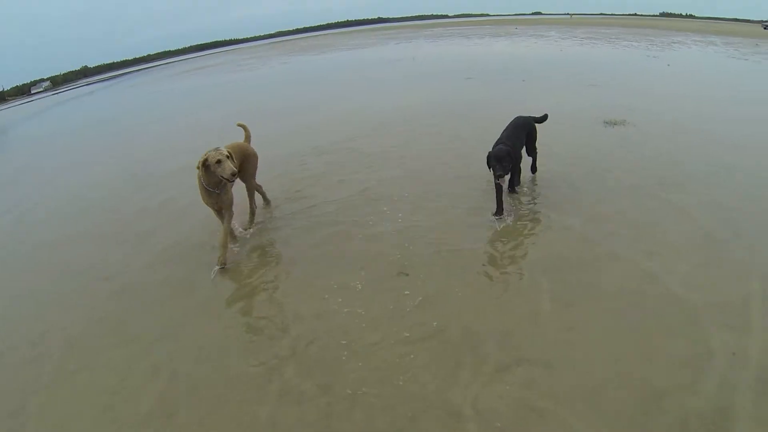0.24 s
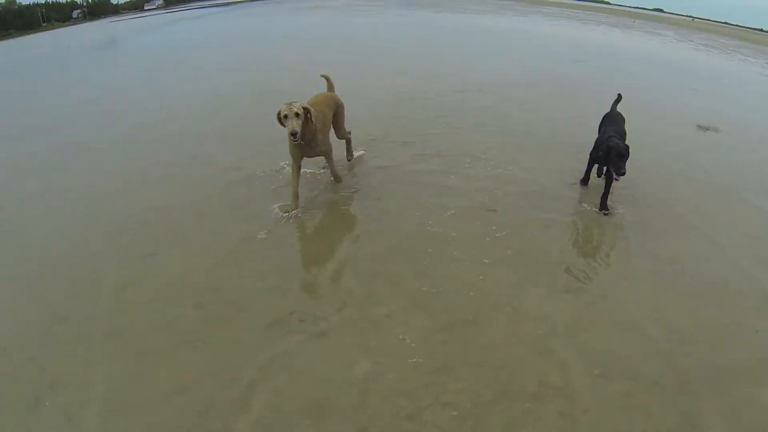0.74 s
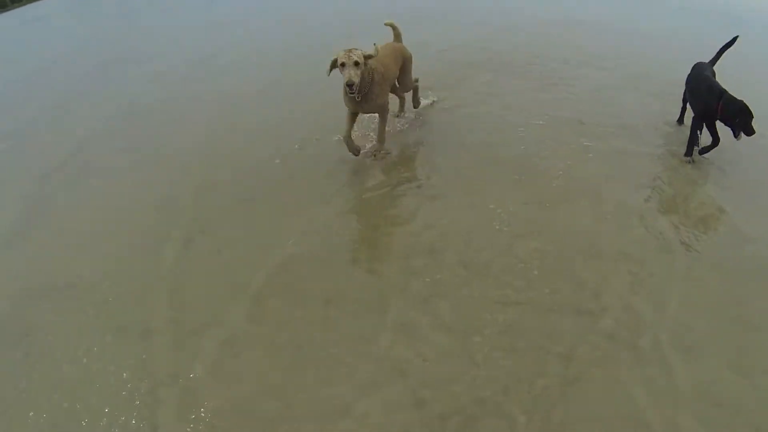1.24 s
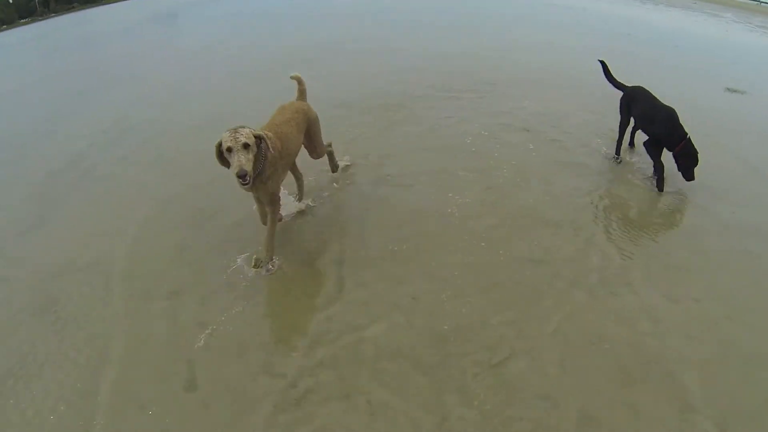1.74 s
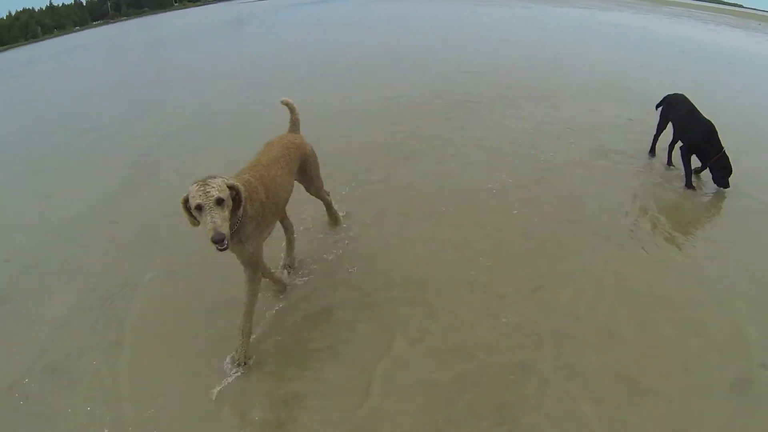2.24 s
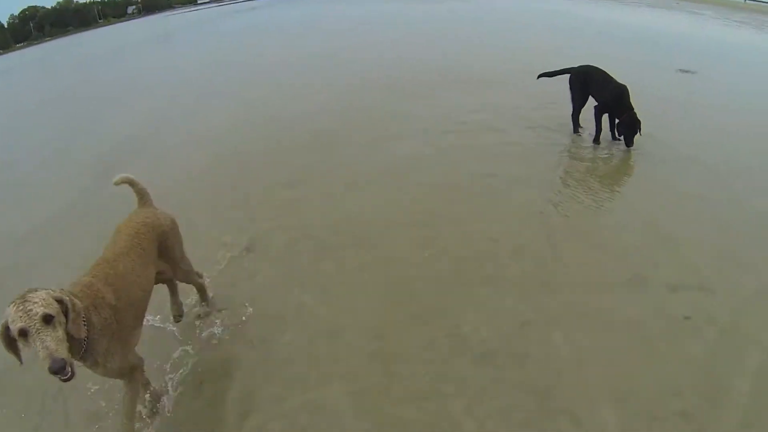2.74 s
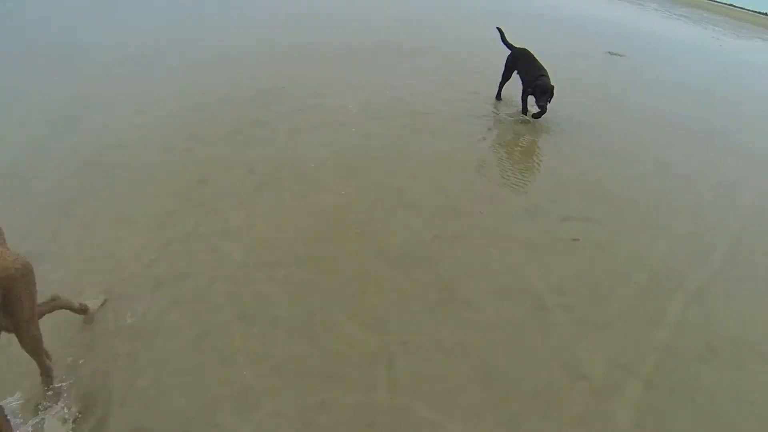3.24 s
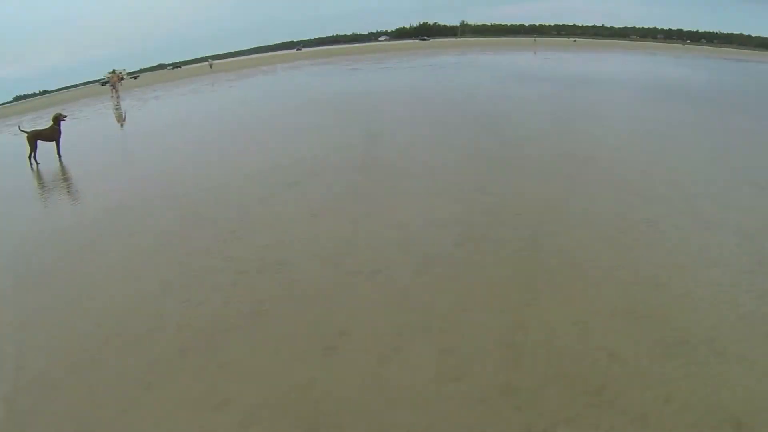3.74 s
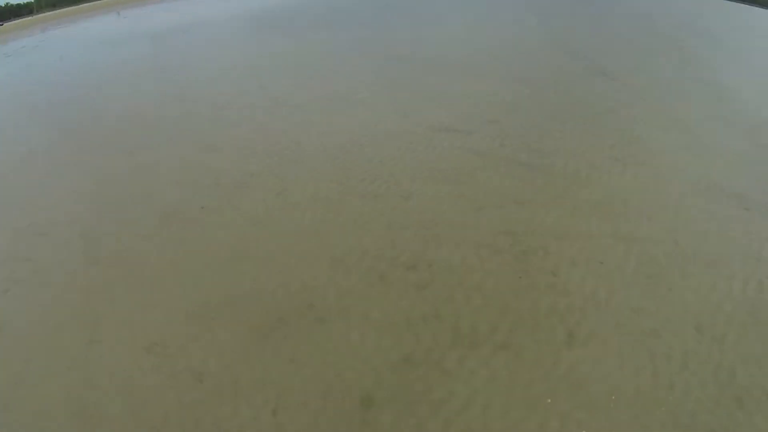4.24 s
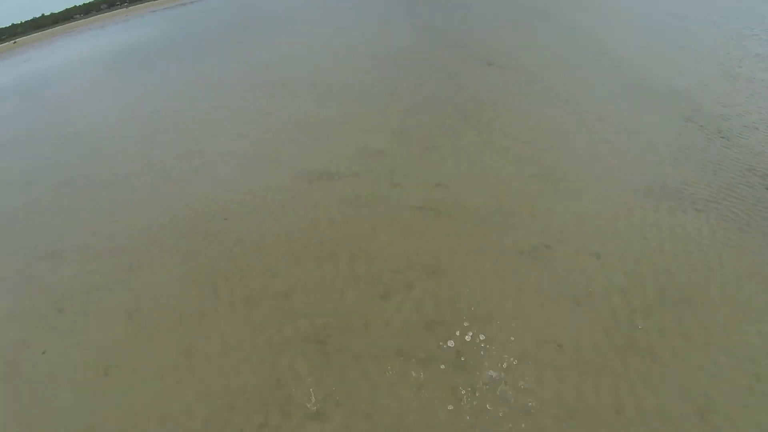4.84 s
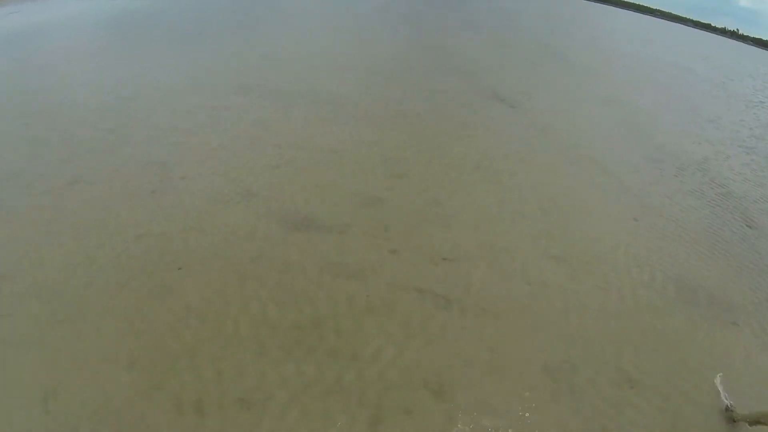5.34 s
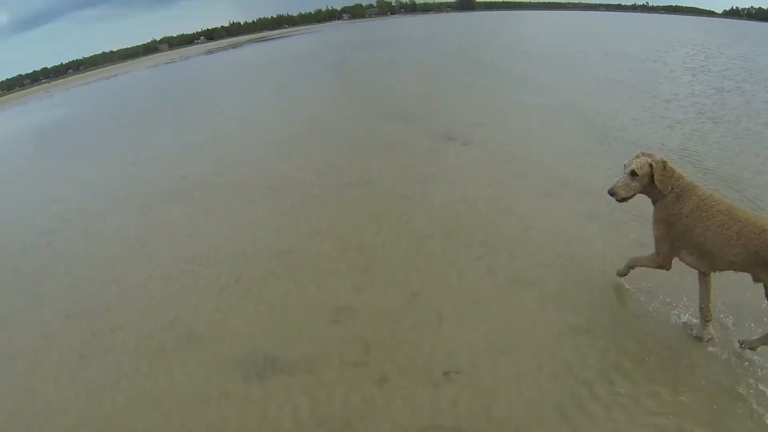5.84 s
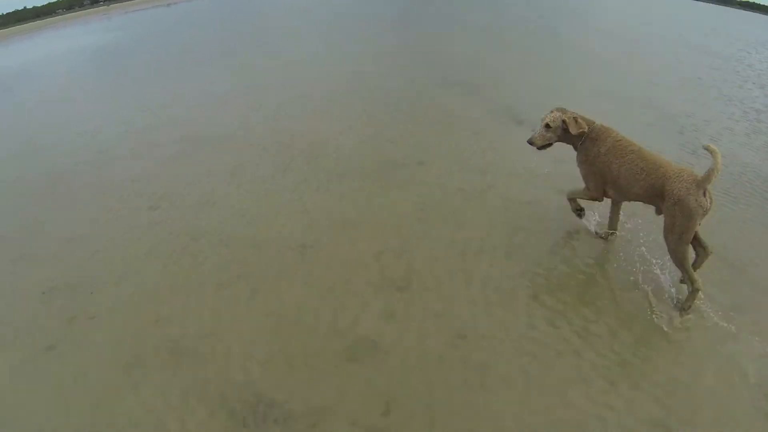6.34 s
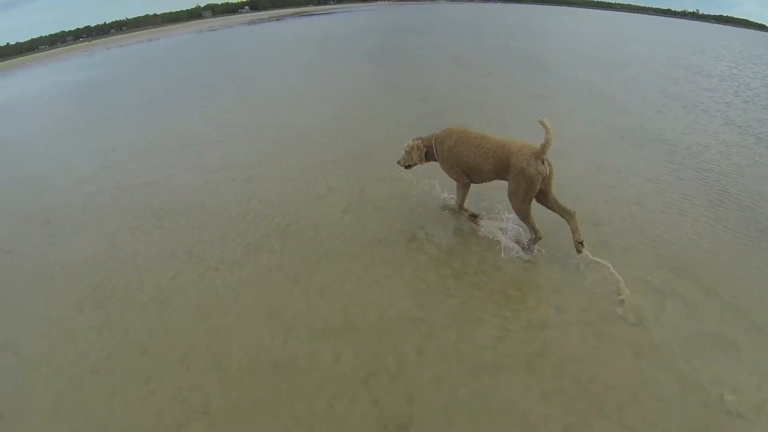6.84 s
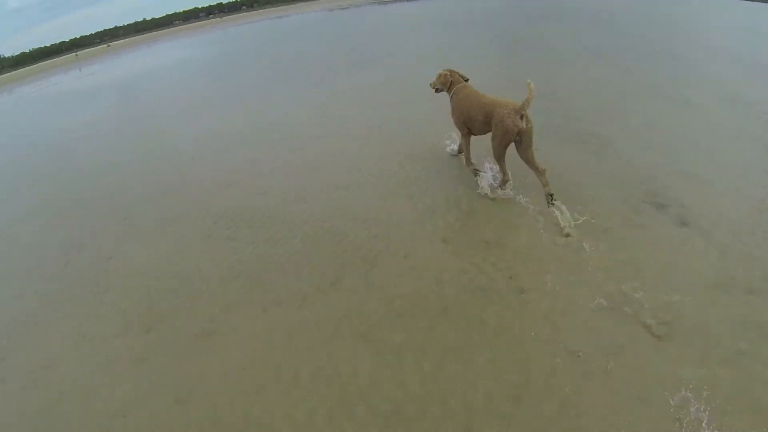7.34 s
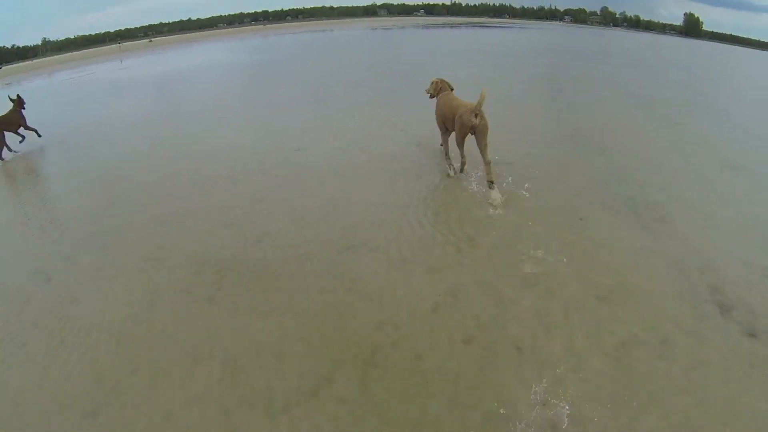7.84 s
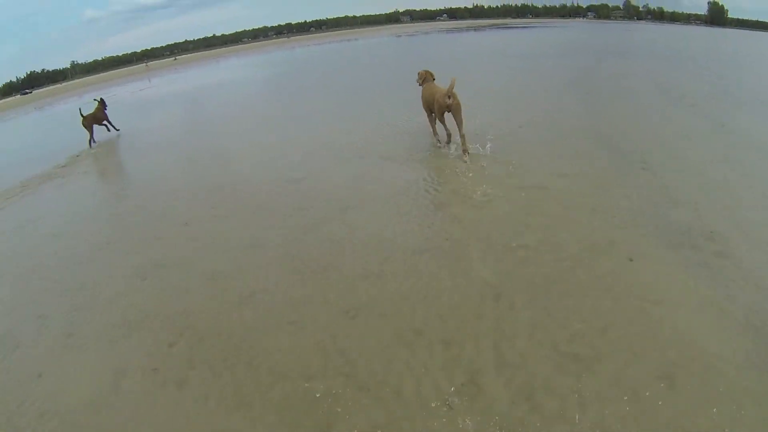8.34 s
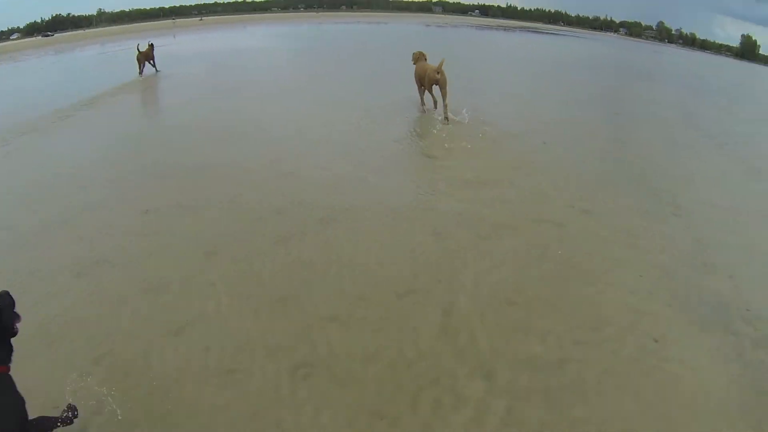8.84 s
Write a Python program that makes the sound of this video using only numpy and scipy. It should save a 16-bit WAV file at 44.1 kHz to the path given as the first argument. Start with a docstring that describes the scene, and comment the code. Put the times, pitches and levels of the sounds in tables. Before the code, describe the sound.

Dogs and a walker wade through shallow lake water, heard through a small plastic housing that makes the sloshes boxy and muffled. Gentle plops and trickles come first, over low step rumble and faint wind. Splashes grow quicker and brighter from about four seconds. Near seven and a half seconds a very loud thump hits, followed by creaking plastic and hand rubbing, then wet splashing and drips carry on.

```python
"""Wading dogs heard from a housing

Dogs and a walker wade through ankle-deep lake water; a microphone shut in a small plastic housing listens.
Slosh, spray and drops are rising-pitch bubbles and noise; the water wash comes dulled through resonances.
Steps and wind shake the mount with low noise; knocks push it and let it spring back.
Late on a hand rubs and creaks the housing: shaped noise, ringing modes and swells of the wading bubbles.
Loud peaks duck the gain."""
import sys
import numpy as np
from scipy import signal
from scipy.io import wavfile

SR = 44100
rng = np.random.default_rng(int(sys.argv[2]) if len(sys.argv) > 2 else 0)


def wav_record(signal):
    """Record a signal, one row per channel, as 16-bit PCM in the file named by sys.argv[1]."""
    frames = np.transpose(np.atleast_2d(signal))
    bounded = np.clip(frames, -1, 1)
    # unit amplitude maps onto the largest positive 16-bit level
    quanta = np.round(bounded * 32767).astype(np.int16)
    wavfile.write(sys.argv[1], SR, quanta)


def decibels_to_gain(level_db):
    """Convert a level in decibels to a linear amplitude gain (20 dB per decade)."""
    exponent = np.asarray(level_db, float) / 20
    return 10 ** exponent


N = 400869

# steady whine: f/Hz, width/Hz, level/dB
WHINE_BANDS = [(5105, 170, -77.5), (10480, 570, -84.5)]
# footfalls and jolts rocking the mount: crest t/s, sway level/dB, fade/s
STEP_SWELLS = [(0.0, -32, 0.23), (0.54, -29.5, 0.14), (0.79, -32, 0.023), (1.21, -31.5, 0.15),
               (1.75, -29, 0.18), (2.3, -25, 0.16), (2.799, -25.5, 0.087), (2.9, -23.5, 0.18),
               (3.17, -25, 0.023), (3.549, -16.5, 0.053), (4.051, -26.5, 0.091), (4.219, -23.5, 0.08),
               (4.658, -19.5, 0.063), (4.8, -23.5, 0.11), (5.235, -16.5, 0.09), (5.6, -30, 0.027),
               (5.891, -14, 0.061), (6.46, -16.5, 0.071), (7.078, -23, 0.13), (7.27, -52, 0.1),
               (7.74, -17.5, 0.16), (8.0, -19, 0.16), (8.21, -18, 0.13), (8.42, -23, 0.057),
               (8.62, -25, 0.088), (8.85, -17, 0.12), (9.05, -33, 0.11)]
# wind buffeting: t/s, level/dB
WIND_LEVELS = [(0.0, -50.5), (1.1, -47), (2.05, -50), (2.6, -43.5), (3.05, -45.5), (3.25, -48),
               (3.5, -44.5), (3.7, -51.5), (4.6, -48), (5.13, -45.5), (5.22, -38.5), (5.3, -47), (5.8, -51),
               (6.33, -48), (6.46, -42), (6.6, -48), (7.0, -52), (7.545, -49), (7.585, -25.5), (7.7, -43),
               (8.06, -39), (8.11, -46), (8.17, -36), (8.21, -33), (8.25, -42.5), (8.42, -53.5),
               (8.8, -45.5), (9.09, -49)]
# knocks on the mount: t/s, swing peak/dB, push time/ms, rebound period/ms, rebound Q, rattle re swing/dB
MOUNT_KNOCKS = [(0.2966, -35, 6.9, 12, 1.2, -28), (0.3087, -31, 3.9, 13, 0.69, -24),
                (0.775, -36.5, 8.5, 27, 1.3, -18), (1.465, -37, 6, 5.7, 1.3, -32),
                (2.2144, -14, 9, 28, 3.4, -28.5), (2.637, -32, 5.6, 12, 2.4, -22),
                (3.489, -28, 10, 77, 0.91, -34), (4.155, -38.5, 3.1, 4.14, 6.1, -25),
                (4.1685, -43, 6.3, 11, 1.1, -36), (4.234, -36.5, 3.8, 14, 0.78, -17),
                (4.488, -42, 0.79, 1.8, 0.68, -10), (4.681, -34.5, 7.8, 16, 0.96, -30),
                (5.19, -48, 12, 23, 0.59, -7), (5.243, -35.5, 3.5, 10, 0.53, -14),
                (5.873, -28.5, 9.2, 16, 0.46, -34), (7.544, 2, 8.9, 43, 1.2, -27),
                (7.602, -26, 2.5, 9, 1.2, -18), (7.716, -11.5, 27, 72, 0.81, -43),
                (7.717, -22.5, 6.3, 4.9, 5.5, -16), (7.998, -28.5, 4.6, 8.4, 1.6, -14),
                (8.009, -33, 2.5, 9.2, 2, -28), (8.026, -29, 4, 8.5, 1.3, -12),
                (8.074, -8, 23.4, 170, 0.41, -41), (8.1344, -11, 7.4, 46, 1.6, -31),
                (8.413, -18, 27, 39, 0.35, -47), (8.9208, -28.5, 4.9, 4.46, 5.1, -33),
                (8.943, -37, 3.9, 4.3, 1.2, -28)]
# stick-slip creaks of the housing: t/s, level/dB, upper modes re level/dB
SHELL_CREAKS = [(7.714, -8.5, -24), (7.727, -24, -28), (7.7309, -22, -24), (7.737, -34, -30),
                (8.008, -26, -30), (8.0133, -27, -35), (8.025, -28, -40), (8.026, -29, -35),
                (8.075, -16, -20), (8.185, -20, -40), (8.19, -10, -23), (8.199, -12.5, -15.5),
                (8.222, -13, -24), (8.3976, -18, -27), (8.4047, -11.5, -32), (8.4137, -17, -22),
                (8.436, -15.5, -37), (8.453, -15, -43), (8.4669, -12, -29), (8.92, -31, -28),
                (8.925, -28, -30), (8.939, -25, -28)]
# modes a creak rings: f/Hz, level/dB, t60/s, share of the creak's upper-mode level (0 to 1)
SHELL_MODES = [(1354, 0, 0.011, 0.065), (1635, 2.5, 0.008, 0.16), (2250, -11.5, 0.005, 0.057),
               (665.4, -17, 0.059, 0.27), (231, 5.5, 0.005, 0.026), (3530, -4.5, 0.019, 1),
               (4970, -4, 0.0049, 1), (6600, -11, 0.0032, 1)]
# hand strokes over the housing: start of full contact t/s, its length/s, scrape level/dB, treble level/dB
HAND_STROKES = [(7.718, 0.0068, -32, -54), (7.742, 0.041, -44.5, -71), (7.866, 0.054, -35.5, -62.5),
                (7.953, 0.083, -43.5, -77), (8.137, 0.015, -49, -89), (8.387, 0.08, -54, -85),
                (8.859, 0.055, -44, -83)]
# grip squeezing the housing: crest t/s, level/dB, fade/s
GRIP_SQUEEZES = [(0.3, -51, 0.013), (1.475, -57.5, 0.026), (2.225, -51, 0.018), (2.641, -56, 0.015),
                 (4.155, -53, 0.032), (5.203, -48.5, 0.012), (7.42, -57.5, 0.02), (7.62, -42, 0.038),
                 (7.724, -46, 0.027), (7.79, -44.5, 0.013), (7.951, -47.5, 0.17), (8.015, -46, .02),
                 (8.07, -43.5, 0.032), (8.145, -41, 0.017), (8.404, -39, 0.012), (8.33, -46.5, 0.027),
                 (8.468, -40, 0.0074), (8.53, -64, 0.025), (8.89, -49, 0.038), (8.93, -45, 0.013)]
# air cavity and port of the housing: f/Hz, width/Hz, lift/dB
CAVITY_MODES = [(640, 434, 21), (1340, 146, 12.5), (1648, 370, 8), (2230, 360, 6.5), (2700, 250, 0.5),
                (3250, 120, 0.5), (5080, 310, 8.5), (10150, 150, 14.5)]
# single plops placed by hand, loud and faint: t/s, peak level/dB, f/Hz
PLOPS = [(0.485, -43, 1450), (0.717, -42.5, 1370), (0.0144, -45, 2280), (0.6325, -53, 2360),
         (1.0814, -46, 2100), (1.0959, -42, 1360), (1.3574, -40.5, 2160), (1.4217, -63, 2320),
         (1.4658, -46, 1050), (1.5474, -55, 2370), (1.6581, -45, 1410), (1.7675, -40, 1350),
         (1.944, -43, 1365), (2.1211, -54, 2120), (2.142, -43.5, 1380), (2.2142, -39, 1350),
         (2.2618, -39.5, 1340), (2.307, -44.5, 1230), (2.411, -43, 1200), (2.6414, -41.5, 1340),
         (2.6888, -40.5, 1390), (2.9488, -43.5, 1400), (3.0964, -42, 1300), (3.1377, -40.5, 1280),
         (3.177, -40.5, 1300), (3.2081, -45, 1210), (3.99, -45, 1470), (4.4433, -44, 2330),
         (4.5331, -46, 1300), (4.6174, -52, 1400), (4.7237, -37, 1370), (4.738, -41, 1380),
         (4.8145, -45, 2270), (4.857, -42, 2300), (4.9337, -46.5, 2300), (4.9944, -32.5, 1310),
         (5.1103, -51, 2250), (5.1682, -45, 1220), (5.213, -45, 1280), (5.3258, -48, 2000),
         (5.5383, -53, 2230), (5.7548, -46, 1500), (5.7987, -47, 2160), (5.798, -44, 1430),
         (5.897, -38, 1320), (5.998, -53, 1010), (6.184, -47, 1360), (6.205, -43, 1350),
         (6.2433, -43, 1350), (6.5121, -46, 1400), (6.59, -52, 1010), (6.7336, -50, 2260),
         (6.7483, -47, 1155), (6.8467, -42, 1370), (7.039, -44, 1360), (8.2715, -43, 1400),
         (8.3225, -39, 1890), (9.034, -40, 1370), (8.3589, -45, 2200), (8.586, -40, 1260),
         (8.5944, -42.5, 2130), (8.738, -49, 2400), (8.776, -43, 2500), (8.823, -49, 710),
         (8.8618, -45, 2070)]
# single spray ticks placed by hand, loud and faint: t/s, level/dB, f/Hz
SPRAY_TICKS = [(2.5631, -44, 2970), (3.1275, -44, 3700), (3.324, -44.5, 3170), (4.3956, -45, 2970),
               (4.7436, -45, 3030), (4.7655, -46, 3540), (5.3497, -50, 3320), (5.5084, -52, 5530),
               (6.1494, -45.5, 7000), (6.15, -45, 4300), (6.163, -52, 7500), (6.377, -51, 3600),
               (6.494, -48, 2780), (6.1968, -55, 6150), (7.2699, -49, 5500), (8.156, -54, 6350),
               (8.2695, -52, 4300), (8.2718, -40.5, 2750), (8.28, -49, 2870), (8.3805, -37, 3540),
               (8.7696, -41.5, 3250), (8.8819, -36.5, 3140), (8.882, -55, 8000), (8.9882, -39.5, 2590),
               (8.998, -51, 5050), (9.03, -43, 4000)]
# water kept moving between the swells: t/s, slosh level/dB, spray level/dB
WATER_LEVELS = [(0.0, -56.5, -63.5), (0.6, -58.5, -64), (1.0, -63, -64), (1.6, -68.5, -66.5),
                (2.4, -54.5, -64.5), (2.9, -58, -61), (3.3, -61, -64.5), (3.8, -62, -67), (4.4, -57.5, -59),
                (5.0, -71, -64.5), (5.5, -60, -65), (6.0, -69, -67), (6.6, -65, -60.5), (7.4, -61, -61.5),
                (7.65, -53, -61), (7.82, -56, -70), (8.05, -51, -61), (8.25, -63, -60.5), (9.09, -59, -59)]
# splashes of legs and paws; from about 7.6 to 8.2 s broad rubbing of the hand on the housing:
# crest t/s, slosh level/dB, spray level/dB, fade/s
SPLASH_AND_RUB_SWELLS = [(0.069, -48, -70, 0.022), (0.35, -57, -69, 0.073), (0.73, -55, -70, 0.046),
                         (0.671, -57, -58, 0.018), (0.83, -73, -63, .03), (1.07, -57, -63, 0.037),
                         (1.15, -52, -80, 0.14), (1.26, -57.5, -65, 0.11), (1.36, -54, -57.5, 0.037),
                         (1.48, -49.5, -73, 0.012), (1.55, -73, -61, 0.048), (1.67, -56, -57.5, 0.018),
                         (1.699, -52.5, -74, 0.036), (1.79, -57, -64, 0.22), (1.94, -54.5, -60.5, 0.044),
                         (2.135, -69, -60, 0.027), (2.22, -56, -61, 0.044), (2.432, -70, -61.5, 0.27),
                         (2.57, -54, -68, 0.013), (2.7, -61, -60, 0.018), (3.03, -52.5, -73, 0.11),
                         (3.09, -69, -57.5, 0.063), (3.33, -73, -57.5, 0.024), (3.41, -56, -57.5, 0.028),
                         (3.491, -61, -57.5, 0.042), (3.74, -62, -60.5, 0.057), (3.87, -58, -58, 0.013),
                         (3.961, -60, -59, 0.024), (4.0, -70, -58, 0.012), (4.058, -70, -51.5, 0.019),
                         (4.149, -51.5, -67, 0.024), (4.22, -52, -63, 0.03), (4.301, -56, -58.5, 0.044),
                         (4.5, -52, -57, 0.018), (4.618, -49, -52.5, 0.0077), (4.7, -52, -59, 0.025),
                         (4.75, -56, -59, 0.026), (4.81, -53, -56.5, 0.051), (4.94, -55, -56, 0.042),
                         (5.008, -49, -53.5, 0.027), (5.04, -68, -59.5, 0.068), (5.09, -52.5, -71, 0.03),
                         (5.15, -71, -58.5, 0.03), (5.22, -47.5, -59, 0.06), (5.27, -55, -61, .05),
                         (5.34, -52, -55, 0.038), (5.561, -67, -54, 0.045), (5.626, -48.5, -54.5, 0.035),
                         (5.79, -59, -56, 0.072), (5.9, -56.5, -56.5, 0.18), (6.149, -73, -55, 0.018),
                         (6.19, -54, -58, 0.053), (6.21, -61, -55, 0.028), (6.377, -56, -51, .006),
                         (6.29, -62, -77, 0.042), (6.345, -60, -67, .03), (6.435, -54, -61, 0.023),
                         (6.478, -49, -56, 0.024), (6.53, -60, -67, 0.02), (6.7, -59, -54.5, 0.013),
                         (6.765, -49, -63, 0.029), (7.05, -54.5, -60, 0.13), (7.279, -52.5, -57.5, 0.084),
                         (7.467, -50, -52.5, 0.014), (7.62, -45, -53, 0.039), (7.75, -60, -44, 0.033),
                         (7.685, -54, -50, 0.035), (7.9, -42, -44, 0.052), (8.012, -40, -69, 0.086),
                         (8.132, -45, -65, 0.016), (8.158, -42, -54.5, 0.023), (8.271, -62, -54, 0.0082),
                         (8.3, -51.5, -57, 0.072), (8.367, -51, -54, 0.017), (8.385, -45, -61, 0.021),
                         (8.595, -50, -50.5, 0.033), (8.646, -57, -52.5, 0.027), (8.776, -60, -58, 0.039),
                         (8.878, -51, -64, .04), (8.926, -30, -58, 0.0034), (9.045, -44, -53, 0.0051),
                         (9.085, -65, -53, 0.015)]
# smaller bubbles draining off legs: crest t/s, level/dB, fade/s
LEG_TRICKLES = [(0.03, -58.5, 0.12), (.63, -62, .03), (1.08, -62, 0.037), (1.2, -57, 0.046),
                (1.42, -58, 0.048), (1.55, -61, .03), (1.7, -61, 0.034), (1.87, -59, 0.056),
                (2.13, -53.5, 0.012), (2.45, -60, 0.28), (2.7, -63, .06), (3.12, -57, 0.099),
                (3.42, -74, .05), (3.97, -71, 0.044), (4.2, -69, .05), (4.45, -60, 0.068), (4.62, -57, .02),
                (4.86, -64, 0.027), (4.935, -58, .02), (5.0, -62, .05), (5.33, -72, 0.037),
                (5.59, -47.5, 0.02), (5.8, -68, .04), (5.9, -71, .04), (6.2, -52, 0.03), (6.49, -68, 0.035),
                (6.66, -55, 0.0099), (6.74, -49, 0.017), (6.85, -55, 0.016), (7.05, -63, .05),
                (7.29, -60, 0.083), (7.46, -86, 0.038), (7.64, -47.5, 0.13), (8.35, -52.5, 0.057),
                (8.61, -51, 0.048), (8.655, -49, .015), (8.78, -56.5, .03), (8.88, -47, 0.049),
                (8.99, -63, 0.023), (9.06, -64, 0.031)]

LAPPING_DB, PORT_HISS_DB, TREBLE_HISS_DB = -89, -70, -79.5
SWAY_HZ, WIND_LOW_HZ, WIND_HIGH_HZ = 16.3, 35.6, 138
SWAY_FLOOR_DB, WIND_LUMP_DB = -43, 2
PUSH_RISE_SHARE = 0.351
FLESH_CYCLES = 5.05  # soft contact rounds the push off above this many cycles per push time
STROKE_EDGE_S, GRIP_FLOOR_DB = 0.045, -70
WALL_CUT_HZ = 2000
STRAY_DULL_DB_PER_OCTAVE, STRAY_LATEST_S = 8, 0.079
PING_DB, SPLAT_S = 1, 0.0074
TRICKLE_FLOOR_DB = -69.5
# rise time over fade time
STEP_RISE_SHARE, SQUEEZE_RISE_SHARE, SPLASH_RISE_SHARE, TRICKLE_RISE_SHARE = 0.86, 0.88, 0.66, 0.55
LIMIT_DB, DUCK_DB_PER_DB, RECOVER_DB_PER_S, DUCK_SMOOTH_S = -7, 3.6, 120, 0.019
SENSE_HZ, PORT_CUT_HZ = 45, 15500


def rms_one(x):
    """Scale to rms 1."""
    return x / np.sqrt(np.mean(x ** 2) + 1e-20)


def in_time(rows):
    """Table columns joined by straight lines, one value a sample."""
    s, *columns = np.transpose(rows)
    return [np.interp(np.arange(N) / SR, s, c) for c in columns]


def cut(x, hz, kind, order=2):
    """Butterworth low-, high- or band-pass."""
    return signal.sosfilt(signal.butter(order, hz, kind, fs=SR, output="sos"), x)


def drift(rate_hz):
    """Slow random signal of rms 1, computed every 40 samples."""
    r = np.exp(-80 * np.pi * rate_hz / SR)
    white = rng.standard_normal(N // 40 + 2002)
    slow = signal.lfilter([1], [1, -2 * r, r * r], white)[2000:]
    return np.interp(np.arange(N) / 40, np.arange(len(slow)), rms_one(slow))


def swells(s, db, fade_s, rise_share):
    """Gain climbing to each crest and dying away after it; overlapping swells add in power."""
    t = np.arange(0, N + 64, 64) / SR
    power = 0
    for crest, level_db, fade in zip(s, db, fade_s):
        time_constant_s = np.where(t < crest, rise_share * fade, fade)
        power = power + decibels_to_gain(2 * level_db) * np.exp(-2 * np.abs(t - crest) / time_constant_s)
    return np.interp(np.arange(N) / SR, t, np.sqrt(power))


def add(out, s, sound):
    """Mix a short sound in at a time."""
    i = round(s * SR)
    out[i:i + len(sound)] += sound[:N - i]


def calm():
    """Far lapping through the housing and the hiss of air at the port, both as filtered noise."""
    lapping = rms_one(housing(cut(rng.standard_normal(N), 940, "high")))
    port = rms_one(cut(rng.standard_normal(N), [240, 750], "band", order=1))
    treble = rms_one(cut(rng.standard_normal(N), [6500, 14500], "band"))
    lapping_gain = decibels_to_gain(LAPPING_DB + 0.81 * drift(1.9))
    port_gain = decibels_to_gain(PORT_HISS_DB + 4.94 * drift(4.5))
    return lapping_gain * lapping + port_gain * port + decibels_to_gain(TREBLE_HISS_DB) * treble


def whine():
    """Faint steady whine: a narrow noise band and another about an octave up."""
    out = 0
    for hz, width, level_db in WHINE_BANDS:
        band = cut(rng.standard_normal(N), [hz - width / 2, hz + width / 2], "band", order=1)
        out = out + decibels_to_gain(level_db) * rms_one(band)
    return out


def shaking():
    """Steps rock the mount mostly below hearing; wind buffets it in lumps."""
    wind_db, = in_time(WIND_LEVELS)
    step_gain = swells(*np.transpose(STEP_SWELLS), STEP_RISE_SHARE)
    sway_gain = np.hypot(decibels_to_gain(SWAY_FLOOR_DB), step_gain)
    sway = cut(rng.standard_normal(N), [7, SWAY_HZ], "band", order=1)
    sway = cut(sway, 25.6, "low", order=4)
    wind = cut(cut(rng.standard_normal(N), WIND_LOW_HZ, "high"), WIND_HIGH_HZ, "low")
    wind = cut(wind, 90, "low", order=1) * decibels_to_gain(WIND_LUMP_DB * drift(22))
    return sway_gain * rms_one(sway) + decibels_to_gain(wind_db) * rms_one(wind)


def knocks():
    """A short push on the membrane, a springy rebound and a dying rattle of the shell."""
    out, t = np.zeros(N), np.arange(8000) / SR
    noise = rng.standard_normal((len(MOUNT_KNOCKS), len(t)))
    for (s, peak_db, push_ms, rebound_ms, q, rattle_db), white in zip(MOUNT_KNOCKS, noise):
        u = 1000 * t / push_ms
        rise = np.minimum(u / PUSH_RISE_SHARE, 1) ** 1.66
        fall = np.clip((u - PUSH_RISE_SHARE) / (1.15 - PUSH_RISE_SHARE), 0, 1)
        push = -rise * np.abs(np.cos(np.pi / 2 * fall)) ** 2.65
        push = cut(push, FLESH_CYCLES * 1000 / push_ms, "low")
        # resonant high-pass: the spring
        w = 2 * np.pi * 1000 / rebound_ms / SR
        k = np.sin(w) / (2 * q)
        swing = signal.lfilter([1, -2, 1], [1 + k, -2 * np.cos(w), 1 - k], push)
        body = rms_one(cut(cut(white, [220, 450], "band", order=1), 1200, "low"))
        crack = 0.19 * rms_one(cut(white, [1100, 6000], "band"))
        rattle = body * np.exp(-t / 0.015) + crack * np.exp(-t / 0.0058)
        add(out, s, decibels_to_gain(peak_db) * (swing / np.abs(swing).max() + decibels_to_gain(rattle_db) * rattle))
    return out


def ring(clicks, hz, t60):
    """Two-pole resonator: a unit click rings a decaying sine of initial height 1."""
    r, w = decibels_to_gain(-60 / (t60 * SR)), 2 * np.pi * hz / SR
    return signal.lfilter([0, np.sin(w)], [1, -2 * r * np.cos(w), r * r], clicks + 1e-18)


def creaks():
    """Each slip is a soft click into the shell's modes; sharper slips wake the upper ones."""
    s, level_db, sharp_db = np.transpose(SHELL_CREAKS)
    at, out = np.round(s * SR).astype(int), np.zeros(N)
    chance = rng.standard_normal((len(at), len(SHELL_MODES)))
    for k, (hz, mode_db, t60, upper) in enumerate(SHELL_MODES):
        clicks = np.zeros(N)
        click_db = level_db + mode_db + upper * sharp_db + 2.85 * chance[:, k]
        clicks[at] = -decibels_to_gain(click_db) * (-1) ** k
        # the slip lasts about a cycle
        soft = cut(clicks + 1e-18, 0.92 * hz, "low")
        soft = cut(soft, [hz / 1.6, 1.64 * hz], "band", order=1)
        out += ring(soft, hz, t60)
    return out


def rub():
    """Skin on plastic: rough noise carried in the shell keeps its treble; the grip works the low body."""
    t, slide, sheen = np.arange(N) / SR, 0, 0
    for s, length_s, scrape_db, treble_db in HAND_STROKES:
        inside_s = np.minimum(t - s, s + length_s - t)
        touch = np.clip(inside_s / STROKE_EDGE_S + 1, 0, 1) ** 2
        slide = slide + decibels_to_gain(scrape_db) * touch
        sheen = sheen + decibels_to_gain(treble_db) * touch
    squeeze_gain = swells(*np.transpose(GRIP_SQUEEZES), SQUEEZE_RISE_SHARE)
    grip = np.hypot(decibels_to_gain(GRIP_FLOOR_DB), squeeze_gain)
    rough = rng.standard_normal(N) * decibels_to_gain(2.6 * drift(90))
    bright = rms_one(cut(rough, [6500, 14000], "band"))
    scrape = rms_one(cut(rough, [1180, 1900], "band", order=3))
    scrape = scrape + 0.22 * rms_one(cut(rough, [2950, 3700], "band", order=3))
    scrape = scrape + 0.11 * rms_one(cut(rough, [3800, 5500], "band"))
    body = rms_one(cut(cut(rough, [180, 520], "band", order=1), 1650, "low", order=3))
    return sheen * bright + slide * scrape + grip * body


def housing(x):
    """The wall dulls airborne sound, the cavity lifts its resonances."""
    x = cut(x, WALL_CUT_HZ, "low")
    for hz, width, lift_db in CAVITY_MODES:
        w, g = 2 * np.pi * hz / SR, decibels_to_gain(lift_db / 2)
        k = np.sin(w) * width / hz / 2
        x = signal.lfilter([1 + k * g, -2 * np.cos(w), 1 - k * g],
                           [1 + k / g, -2 * np.cos(w), 1 - k / g], x)
    return x


def blip(hz, cycles, rise):
    """One bubble: swells for some cycles, fades, and climbs in pitch as it nears the surface."""
    u = np.arange(int(8 * cycles / hz * SR) + 2) * hz / SR
    tone = np.sin(2 * np.pi * u * (1 + rise * u / cycles / 2))
    return tone * u / cycles * np.exp(1 - u / cycles)


def strays(low_hz, high_hz, mean_db, spread_db, count):
    """Random rows of t/s, level/dB, f/Hz just after some crest of the swells; mean_db holds at low_hz."""
    which, late, size, pitch = rng.random((count, 4)).T
    crests = np.transpose(SPLASH_AND_RUB_SWELLS)[0]
    hz = low_hz * (high_hz / low_hz) ** pitch
    db = mean_db + spread_db * (2 * size - 1) - STRAY_DULL_DB_PER_OCTAVE * np.log2(hz / low_hz)
    s = crests[(which * len(crests)).astype(int)] + STRAY_LATEST_S * late
    return list(zip(np.minimum(s, (N - 1) / SR), db, hz))


def drops():
    """A plop is one large bubble; a spray tick is a small, few-cycle one with a broad splat."""
    out, t = np.zeros(N), np.arange(400) / SR
    plops = list(PLOPS) + strays(1194, 1445, mean_db=-49.5, spread_db=0.5, count=20)
    ticks = list(SPRAY_TICKS) + strays(2804, 6000, mean_db=-55, spread_db=2, count=34)
    for (s, peak_db, hz), (rise, long) in zip(plops, rng.random((len(plops), 2))):
        add(out, s, decibels_to_gain(peak_db) * blip(hz, 2.6 + 1.2 * long, 0.03 * rise))
    noise = rng.standard_normal((len(ticks), len(t)))
    for (s, level_db, hz), long, white in zip(ticks, rng.random(len(ticks)), noise):
        add(out, s, decibels_to_gain(level_db + PING_DB) * blip(hz, 0.76 + 1.2 * long, 0.017))
        splat = cut(white * np.exp(-t / SPLAT_S), [hz / 1.27, 1.23 * hz], "band", order=1)
        splat = cut(splat, 1.1 * hz, "low")
        add(out, s, decibels_to_gain(level_db) * splat / np.abs(splat).max())
    return out


def bubbles(low_hz, high_hz, per_s, cycles, spread_db, clump_db, wash):
    """Bubbles born in clumps ring a few cycles, rising in pitch, over a wash of moving water."""
    sizes = decibels_to_gain(spread_db * np.minimum(rng.exponential(1, N), 5)) * rng.choice([-1, 1], N)
    dice, together, rings = rng.random(N), drift(19), 0
    dealt = rng.integers(0, 14, N)  # pitch class of each candidate
    for k, hz in enumerate(np.geomspace(low_hz, high_hz, num=14)):
        clump = decibels_to_gain(clump_db * (0.6 * together + drift(15)))
        born = dice < per_s * clump / SR
        clicks = sizes * born * (dealt == k)
        rings = rings + signal.oaconvolve(clicks, blip(hz, cycles, rise=0.055))[:N]
    noise = cut(rng.standard_normal(N), [low_hz, high_hz], "band")
    return rms_one(housing(rms_one(rings) + wash * rms_one(noise)))


def wading():
    """Legs drag big bubbles under and throw fine spray up; the same layers carry the hand's broad rubbing."""
    slosh_db, spray_db = in_time(WATER_LEVELS)
    s, swell_slosh_db, swell_spray_db, fade_s = np.transpose(SPLASH_AND_RUB_SWELLS)
    slosh_gain = np.hypot(decibels_to_gain(slosh_db), swells(s, swell_slosh_db, fade_s, SPLASH_RISE_SHARE))
    spray_gain = np.hypot(decibels_to_gain(spray_db), swells(s, swell_spray_db, fade_s, SPLASH_RISE_SHARE))
    trickle_swell = swells(*np.transpose(LEG_TRICKLES), TRICKLE_RISE_SHARE)
    trickle_gain = np.hypot(decibels_to_gain(TRICKLE_FLOOR_DB), trickle_swell)
    slosh = bubbles(1023, 1842, per_s=2600, cycles=5.07, spread_db=4.0, clump_db=4.0, wash=0.73)
    spray = bubbles(2970, 9400, per_s=5000, cycles=2.1, spread_db=4.0, clump_db=4.0, wash=1.31)
    mist = bubbles(6200, 12000, per_s=3000, cycles=1.0, spread_db=7.0, clump_db=4.5, wash=0.51)
    trickle = bubbles(1877, 2950, per_s=900, cycles=5.1, spread_db=5.0, clump_db=4.5, wash=0.49)
    return trickle_gain * trickle + slosh_gain * slosh + spray_gain * (spray + decibels_to_gain(-9.5) * mist)


def scene():
    """Everything reaches one microphone."""
    mount = shaking() + knocks()
    hand = creaks() + rub()
    water = drops() + wading()
    return (calm() + whine() + mount + hand + water)[None, :]


def top_cut(x):
    """Nothing passes above the cut-off."""
    return signal.sosfilt(signal.butter(12, 15220, fs=SR, output="sos"), x)


def record(dry):
    """Gain control, deaf to the slowest sway, ducks just after a loud peak and recovers steadily."""
    sensed = np.abs(cut(dry[0], SENSE_HZ, "high"))
    over_db = np.maximum(20 * np.log10(sensed + 1e-9) - LIMIT_DB, 0)
    ramp_db = RECOVER_DB_PER_S * np.arange(N) / SR
    duck_db = np.maximum.accumulate(DUCK_DB_PER_DB * over_db + ramp_db) - ramp_db
    r = np.exp(-1 / (DUCK_SMOOTH_S * SR))
    gain = decibels_to_gain(-signal.lfilter([1 - r], [1, -r], duck_db))
    top = cut(dry, PORT_CUT_HZ, "low", order=4)  # the microphone port rolls the top off
    mix = np.clip(top * gain, -0.96, 0.96)
    return top_cut(mix)


dry = scene()
out = record(dry)
wav_record(out)
```